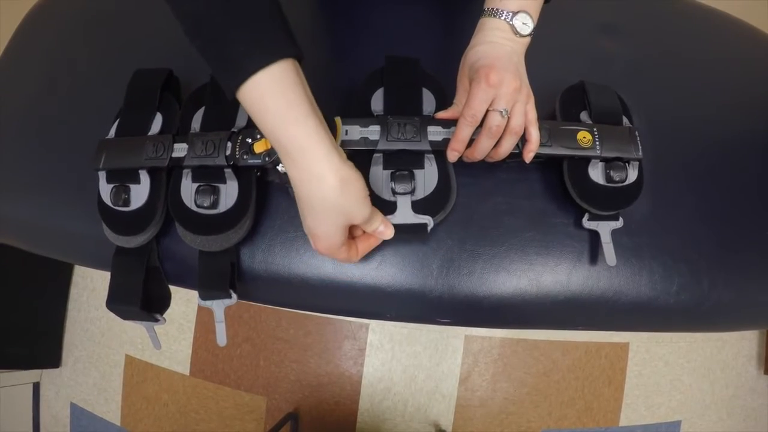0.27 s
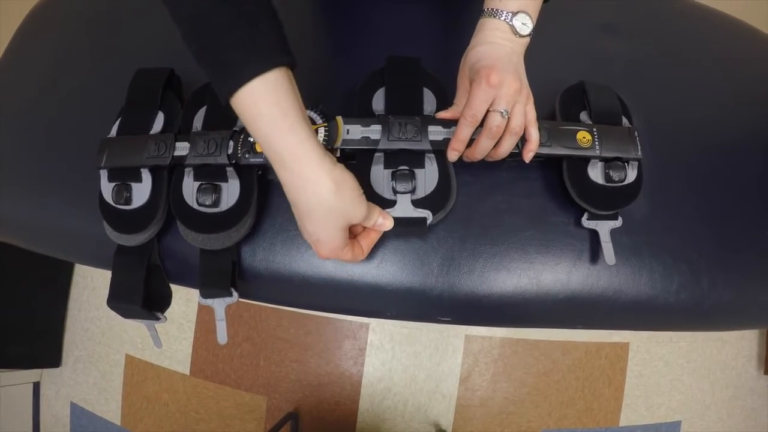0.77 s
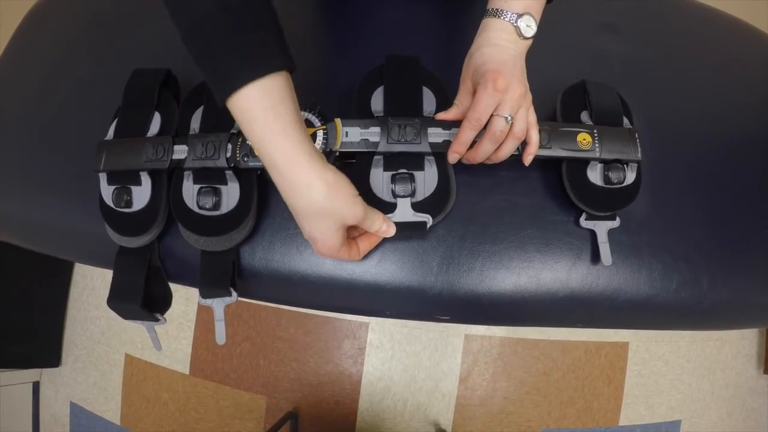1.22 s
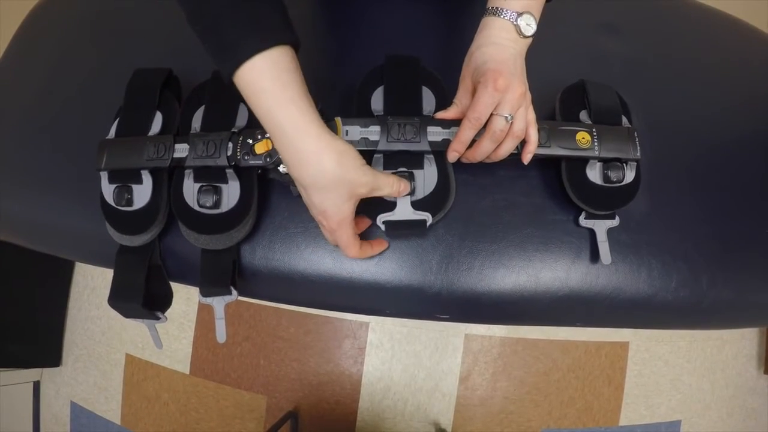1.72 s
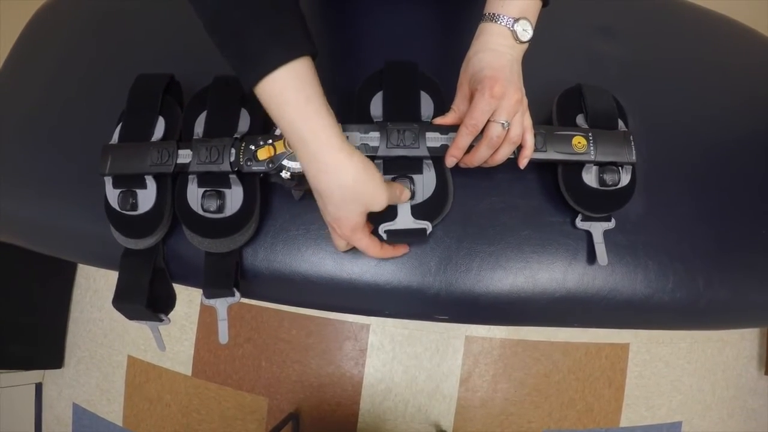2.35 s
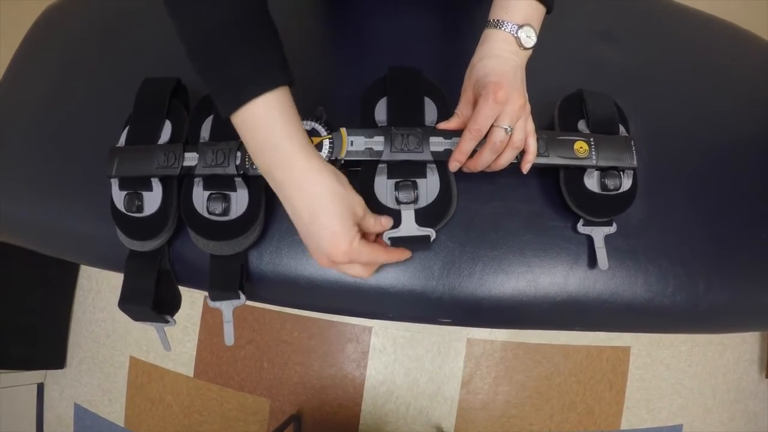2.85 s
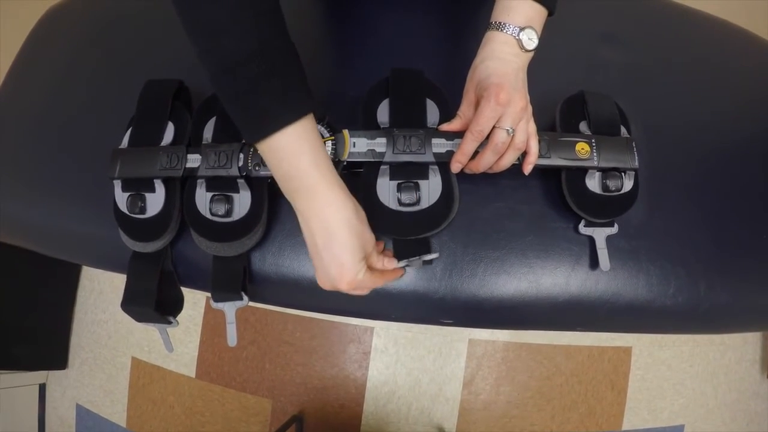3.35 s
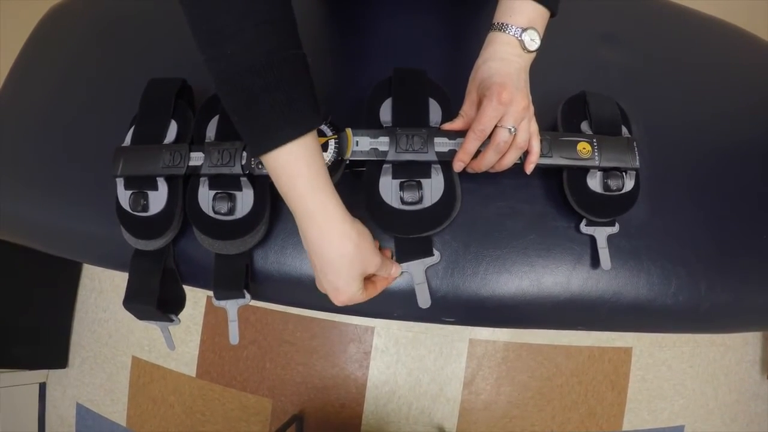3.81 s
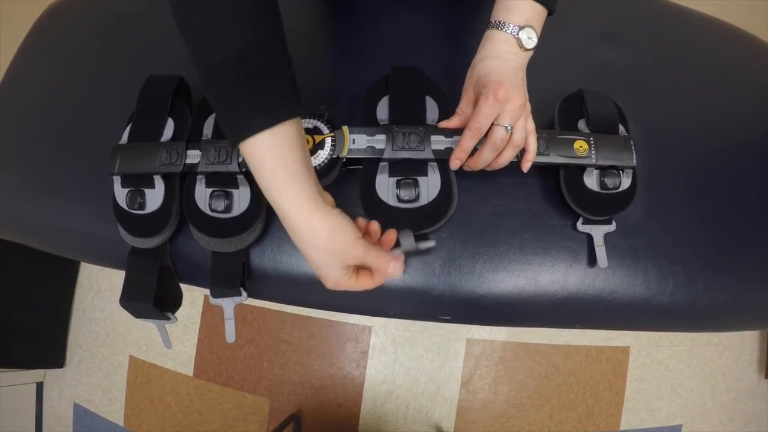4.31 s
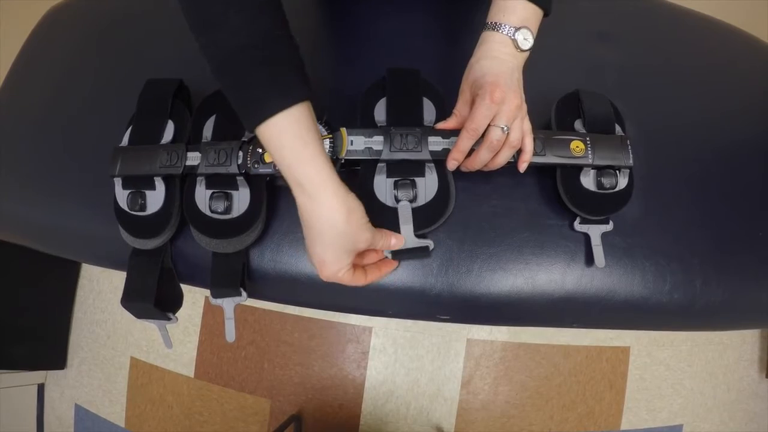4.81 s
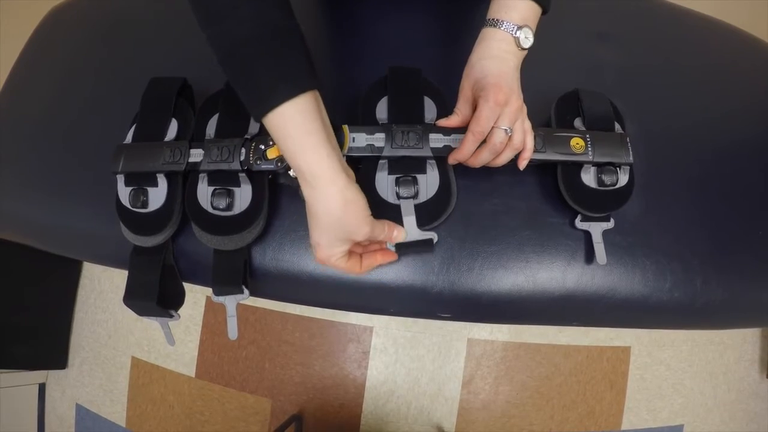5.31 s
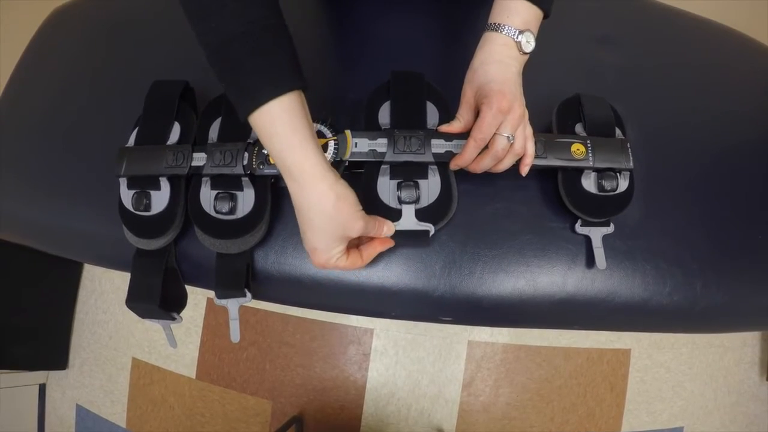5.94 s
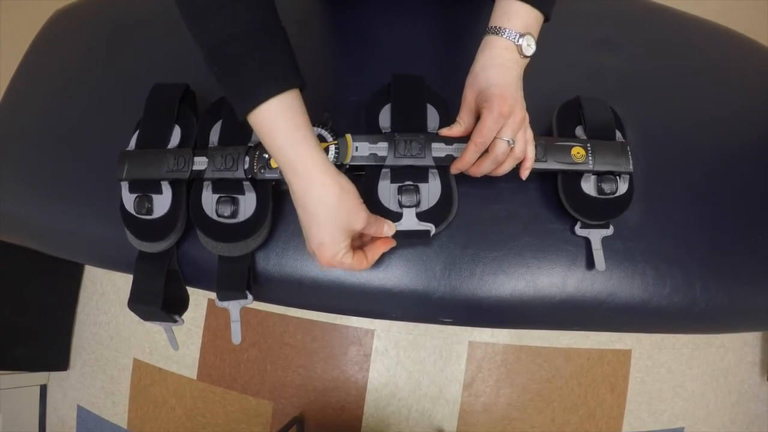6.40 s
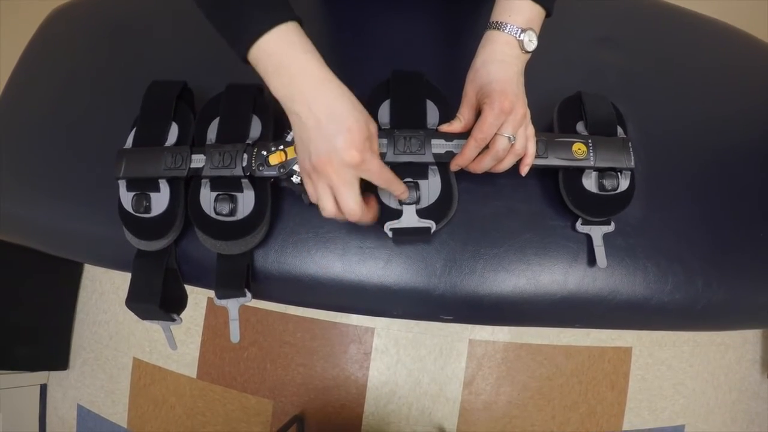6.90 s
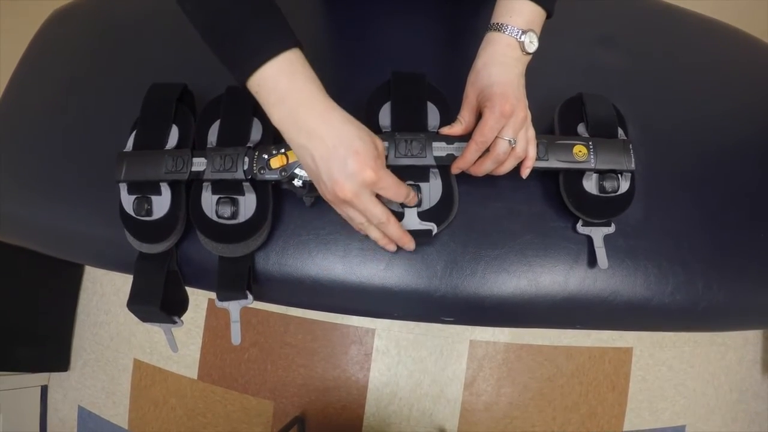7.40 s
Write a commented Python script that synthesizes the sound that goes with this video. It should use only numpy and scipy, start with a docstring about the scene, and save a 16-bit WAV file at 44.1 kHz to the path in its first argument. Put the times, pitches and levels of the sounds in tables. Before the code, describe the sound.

Close up in a small, quiet room, fingers handle a plastic brace buckle. Small ticks and a short scrape lead to a crisp snap, then softer fumbling. A harder, clustered snap comes at about two and a half seconds, a springy release a second later, then scrapes and ticks before a final double snap. Strap rubbing, dull padded knocks and faint ventilation lie beneath.

```python
"""Buckle of a knee brace

A plastic buckle on a knee brace is snapped shut, released and snapped shut again on a padded table in a small room.
Short pushes ring the resonances of the plastic and the frame: snaps, ticks, scrapes and dull knocks.
Shaped noise makes the fingers rubbing the strap, the arm shifting, and the ventilation, which also hums.
The recorder's noise suppressor turns quiet treble down, but lets the hiss up for a moment after very loud clicks.
"""
import sys
import numpy as np
from scipy import signal
from scipy.fft import rfft, irfft, next_fast_len
from scipy.io import wavfile
from scipy.ndimage import uniform_filter1d, map_coordinates

SR = 44100
rng = np.random.default_rng(int(sys.argv[2]) if len(sys.argv) > 2 else 0)


def master_out(mix):
    """Clip the mix to full scale and print it as 16-bit PCM to the path in sys.argv[1]."""
    frames = np.transpose(np.atleast_2d(mix))
    ceiling = np.clip(frames, -1, 1)
    pcm = np.round(ceiling * 32767).astype(np.int16)
    wavfile.write(sys.argv[1], SR, pcm)


N = 337806  # length in samples
TOP_HZ = 16300  # upper limit of the sound

# resonances of the tab that slides in the slot: (pitch_hz, width_hz, level_db)
TAB_MODES = [(950, 1000, -24.5), (2940, 490, -18.5), (5450, 570, -14), (6330, 500, -5), (8200, 510, 6),
             (9800, 310, -3.5), (10620, 700, -6.5), (12150, 540, -8), (13700, 400, -27)]
# spectrum of low moving air, also used for the arm: (pitch_hz, relative level_db per Hz)
LOW_SPECTRUM = [(10, -24), (20, -0.5), (29, 2), (40, -4.5), (62, -5), (90, -16.5), (160, -29.5), (400, -60)]


def amp(db):
    """Turn decibels into gain."""
    return 10 ** (np.asarray(db) / 20)


def unit(x):
    """Scale to an average (rms) level of 1."""
    return x / np.sqrt(np.mean(x ** 2) + 1e-20)


def along(points, hz):
    """Read a value between (pitch_hz, value) points, on a log pitch axis."""
    point_hz, value = np.transpose(points)
    return np.interp(np.log(hz + 1), np.log(point_hz + 1), value)


def wobble(rate):
    """Draw a smooth random curve with this many random points a second."""
    points = rng.standard_normal(int(N * rate / SR) + 4)
    return map_coordinates(points, [np.arange(N) * rate / SR])


def filtered(x, response):
    """Change the strength of each frequency by response(hz)."""
    size = next_fast_len(len(x) + SR // 8)
    hz = np.fft.rfftfreq(size, 1 / SR)
    return irfft(rfft(x, size) * response(hz), size)[:len(x)]


def coloured(x, spectrum):
    """Give x a spectrum, at rms 1."""
    return unit(filtered(x, lambda hz: amp(along(spectrum, hz))))


def add(track, s, x):
    """Mix x into the track from time s."""
    start = max(round(s * SR), 0)
    track[start:start + len(x)] += x[:max(N - start, 0)]


def blow(length, chatter):
    """One sharp push, then the chatter of touching surfaces, dying away over length seconds."""
    t = np.arange(SR // 2) / SR
    grit = rng.standard_normal(len(t)) * np.exp(-t / length)
    force = chatter * grit / np.linalg.norm(grit)
    force[0] += 1
    return force


def ring(force, modes, bright, pitch=1, travel=.0003, scatter_db=0.36, steepness=1.326):
    """A force rings the resonances, a little differently every time; a bright contact favours high ones."""
    hz, width, db = np.transpose(modes)[:, :, None]
    hz = hz * pitch
    tilt_db = bright * np.log2(hz / hz.mean())
    gains = amp(db + tilt_db + scatter_db * rng.standard_normal(hz.shape))
    f = np.fft.rfftfreq(len(force), 1 / SR)
    humps = (f * width) ** 2 / ((hz ** 2 - f ** 2) ** 2 + (f * width) ** 2)
    power = np.sum(gains ** 2 * humps ** steepness, axis=0)
    # minimum phase: the part answers only after the push
    cepstrum = irfft(np.log(power + 1e-9) / 2)
    cepstrum[1:] *= 2
    cepstrum[len(cepstrum) // 2:] = 0
    # bending waves take the travel time (s) to cross the part, low ones longer, which rounds the attack
    lag = 4 * np.pi * travel * np.sqrt(hz.mean() * f)
    return irfft(rfft(force) * np.exp(rfft(cepstrum) - 1j * lag))


def peaked(x, db):
    """Scale so that the envelope peaks at db."""
    return amp(db) * x / np.abs(signal.hilbert(x)).max()


def in_room(x, room_db, wall_delay=.0082, wall_db=-12, near_db=-5):
    """Direct sound, scatter from things nearby, the first wall's echo and then the diffuse tail."""
    # how long the room takes to fade by 60 dB: (pitch_hz, fade_s)
    fade_times = [(200, 0.61), (600, 0.19), (1500, .34), (4000, .27), (8000, .235), (14000, .17)]
    hz, t, z = signal.stft(rng.standard_normal(SR // 2), SR, nperseg=256)
    fading = z * amp(-60 * t / along(fade_times, hz)[:, None])
    tail = signal.istft(fading, SR, nperseg=256)[1]
    first = round(wall_delay * SR)
    tail[:first] *= amp(near_db)
    tail /= np.linalg.norm(tail)
    tail[first] += amp(wall_db)
    return x + amp(room_db) * signal.fftconvolve(x, tail)[:len(x)]


def swell(s, db, length):
    """Gain of one movement: it speeds up to its top at time s and dies away."""
    rise = .46  # share of the length spent speeding up
    edge_db, roundness = 7.5, 1.4  # drop at either end, shape of the top
    t = np.arange(N) / SR - s
    away = np.abs(t) / (length * np.where(t < 0, rise, 1 - rise))
    return amp(db - edge_db * np.minimum(away, 10) ** roundness)


def background(air_db=-64.0, hum_db=-68, hum_hz=120):
    """Ventilation: low wandering draught, even hiss and a slightly unsteady mains hum."""
    # spectrum of the hiss: (pitch_hz, relative level_db per Hz)
    air_spectrum = [(40, -10.5), (130, 1.5), (190, -5.5), (260, -4.5), (340, -11), (700, -13),
                    (1200, -13.5), (2500, -15), (4700, -18), (8200, -19), (10500, -23), (14000, -25.5),
                    (16000, -35)]
    draught_gain = amp(-57.5 + 1.17 * wobble(5))  # middle level and its wander, in dB
    rumble = draught_gain * coloured(rng.standard_normal(N), LOW_SPECTRUM)
    hiss = amp(air_db) * coloured(rng.standard_normal(N), air_spectrum)
    phase = 2 * np.pi * hum_hz * np.arange(N) / SR + 0.26 * wobble(7.8)
    hum = unit(np.sin(phase) * amp(3.0 * wobble(3)))
    return rumble + hiss + amp(hum_db) * hum


def rubbing(grain_db=2.0, flutter_db=2.0):
    """Skin and webbing slide with a fine, grainy hiss: strokes over a faint, restless grip."""
    # spectrum of the rubbed strap: (pitch_hz, relative level_db per Hz)
    strap_spectrum = [(200, -30.5), (600, -13.5), (1500, -14.5), (3400, -12), (4700, -22.5), (6300, -8),
                      (8300, 0), (10500, -13), (14000, -12.5), (16000, -29)]
    # strokes of the fingers along the strap: (fastest_s, level_db, length_s)
    strokes = [(0.24, -54.5, 0.43), (1.118, -55, 0.11), (1.524, -54.5, .12), (2.422, -61.5, 0.56),
               (2.918, -61, 0.14), (3.383, -56, 0.46), (3.82, -60, 0.4), (4.397, -54, 0.13),
               (4.663, -55.5, 0.33), (4.91, -54.5, 0.076), (5.225, -60, 0.36), (5.561, -56, .25),
               (5.854, -59, 0.16), (6.21, -57.5, 0.16), (6.77, -57.5, 0.063), (7.549, -58.5, .09)]
    grains = rng.standard_normal(N) * amp(grain_db * wobble(700) + flutter_db * wobble(35))
    # the fingers shift slightly as they hold the strap: middle level and its wander, in dB
    grip = amp(-70.5 + 1 * wobble(4))
    sliding = np.sqrt(grip ** 2 + sum(swell(*stroke) ** 2 for stroke in strokes))
    return sliding * coloured(grains, strap_spectrum)


def knocks():
    """The frame takes each push on the padding as a dull knock; faint nudges fall at chance times."""
    # resonances of the brace frame: (pitch_hz, width_hz, level_db)
    frame_modes = [(134, 70, -5.5), (251, 62, 0.5), (390, 89, -5), (580, 400, -4.5), (870, 120, -7),
                   (1400, 700, -20.5)]
    # frame knocking on the padding: (start_s, peak_db, brightness in dB per octave)
    pushes = [(.28, -51.5, -0.5), (.622, -50.5, -8), (1.049, -43, 1.5), (1.119, -39, -0.5), (1.132, -45, 0),
              (1.643, -48.5, 3.5), (2.076, -50, 3.5), (2.323, -50, 3), (2.417, -49, 4.5), (2.4907, -39, -2),
              (2.657, -43.5, 5), (3.248, -45.5, -0.5), (3.397, -56, 2.5), (3.474, -42, -5),
              (4.282, -44.5, 1), (4.934, -48, 2), (6.104, -51, -3), (7.276, -53, -2), (7.421, -47, 0.5),
              (7.532, -47, -2.5)]
    nudge_count, nudge_db, nudge_spread_db = 12, -57, 2  # how many, peak level, its scatter
    nudges = [(rng.uniform(0, N / SR), rng.normal(nudge_db, nudge_spread_db), 0)
              for _ in range(nudge_count)]
    out = np.zeros(N)
    for s, db, bright in pushes + nudges:
        knock = ring(blow(length=.004, chatter=0.34), frame_modes, bright)
        add(out, s, in_room(peaked(knock, db), room_db=-2.5))
    return out


def ticks():
    """Light touches of tab and catch ring only the catch."""
    # resonances of the catch: (pitch_hz, width_hz, level_db)
    catch_modes = [(985, 900, -31.5), (2000, 1600, -31), (3685, 850, -14), (6950, 1500, -6.5),
                   (8800, 1100, -1), (10300, 920, -14.5), (13000, 1800, -24.5)]
    # light touches: (start_s, peak_db, pitch factor, brightness in dB per octave)
    touches = [(.132, -36, 0.92, 0), (.1987, -37.5, 0.81, 6), (0.2025, -34, 0.89, -5),
               (.2291, -25.5, .91, 4), (0.7754, -28, 0.97, -6.5), (2.6567, -28, 0.84, 19),
               (2.704, -26, 0.97, -0.5), (3.3979, -31.5, 0.87, -5.5), (3.7823, -24, 1.01, 0.5),
               (4.2832, -38, 1.1, -1), (4.5018, -37, 1.03, 12), (5.4547, -36.5, 0.96, -6.5),
               (5.518, -32.5, .907, -4), (5.6187, -36, 0.94, -7.5), (5.8204, -37.5, 1, -6.5),
               (5.8858, -36, 0.97, -9.5), (6.121, -37.5, 0.89, 7), (7.055, -33.5, 1.07, 4),
               (7.2763, -28.5, 0.93, -3.5), (7.532, -38, 1.03, -2)]
    out = np.zeros(N)
    for s, db, pitch, bright in touches:
        tick = ring(blow(length=0.00043, chatter=0.56), catch_modes, bright, pitch)
        add(out, s, in_room(peaked(tick, db), room_db=-7))
    return out


def scrapes(slip_rate=1100):
    """The tab sticks and slips along the slot: a quick run of uneven slips (per second) rings it."""
    # runs of slips: (start_s, level_db, length_s, pitch factor, brightness in dB per octave)
    runs = [(0.333, -49.5, 0.007, 1, -8.5), (0.345, -51.5, 0.034, 0.77, -4),
            (1.085, -63.5, 0.034, 0.79, -7), (3.258, -58.5, 0.025, 0.75, 0.5), (3.347, -60, 0.23, 0.75, -6),
            (4.369, -67.5, 0.063, 0.79, -8), (4.714, -52, 0.019, 0.95, -5), (4.899, -55, 0.035, 0.97, -2),
            (5.527, -63, 0.12, 0.89, -6.5), (5.876, -56, 0.014, 0.78, -6.5)]
    out = np.zeros(N)
    t = np.arange(SR // 2) / SR
    for s, db, length, pitch, bright in runs:
        strength = rng.standard_normal(len(t))
        happens = rng.random(len(t)) < slip_rate / SR
        slips = strength * happens * (t < length)
        slips[0] = 1
        scrape = ring(slips, TAB_MODES, bright, pitch)
        scrape *= amp(db) * np.sqrt(length * SR) / np.linalg.norm(scrape)
        add(out, s, in_room(scrape, room_db=-2.5))
    return out


def snaps(rows, modes, chatter, travel):
    """Bent plastic springs free and slaps against its stop; the thumb on it takes off the top."""
    out = np.zeros(N)
    for s, db, pitch, bright, length, room_db, muffle_hz in rows:
        snap = ring(blow(length, chatter), modes, bright, pitch, travel)
        thumb = signal.butter(2, min(muffle_hz, TOP_HZ), fs=SR, output="sos")
        snap = signal.sosfilt(thumb, snap)
        # level counted as rms over 10 ms
        snap *= amp(db) * np.sqrt(SR / 100) / np.linalg.norm(snap)
        add(out, s, in_room(snap, room_db))
    return out


def snapping_shut():
    """The catch snaps into place and rings the whole buckle."""
    # resonances of the buckle: (pitch_hz, width_hz, level_db)
    buckle_modes = [(970, 550, -26), (2050, 990, -23.5), (3185, 480, -11), (5240, 750, -4.5),
                    (6400, 750, -1), (7440, 290, -2.5), (8440, 1000, 1), (9600, 440, -9),
                    (11500, 1600, -9.5), (12640, 1800, -15.5), (14300, 1500, -22)]
    # snaps of the catch: (start_s, level_db, pitch factor, brightness in dB per octave,
    # contact_s, room_db, muffle_hz above which the thumb dulls it)
    closings = [(.622, -25, 1, -0.5, .0004, -1, 14000), (2.4878, -38.5, 0.84, -7, 0.0018, -11.5, 12000),
                (2.4914, -23.5, 1.1, 1, 0.0027, -8, 9100), (2.4942, -24.5, 1.08, 1.5, .0007, -4, 9100),
                (6.234, -24.5, 1, -0.5, 0.0004, 0.8, 13000), (6.295, -31, 0.97, -1.5, 0.00053, -6.5, 14000)]
    return snaps(closings, buckle_modes, chatter=0.55, travel=.0007)


def springing_open():
    """The tab springs out of its slot and rings by itself."""
    # release of the tab: (start_s, level_db, pitch factor, brightness in dB per octave,
    # contact_s, room_db, muffle_hz above which the thumb dulls it)
    releases = [(3.4736, -27.5, 0.99, -1, 0.0023, -6.5, 14000)]
    return snaps(releases, TAB_MODES, chatter=0.39, travel=.0015)


def arm():
    """The arm shifting its weight over the table adds soft, low swells of noise."""
    # shifts of the arm: (top_s, level_db, length_s)
    moves = [(4.153, -55, 0.21), (4.62, -52.5, 0.15), (5.32, -50, .16), (6.79, -43, .11)]
    return sum(swell(*move) for move in moves) * coloured(rng.standard_normal(N), LOW_SPECTRUM)


def suppress(x, depth_db=9, quiet_db=-55, span_db=13, loud_db=-29.0, hold=0.405, corner_hz=520):
    """Quiet treble is turned down; a click passes at once, a very loud one holds it open (hold in s)."""
    treble = filtered(x, lambda hz: hz * hz / (hz * hz + corner_hz * corner_hz))

    def level(size):
        """Treble level in dB, averaged over size samples."""
        return 10 * np.log10(np.abs(uniform_filter1d(treble ** 2, size)) + 1e-14)

    passing = np.clip((level(size=SR // 300) - quiet_db) / span_db, 0, 1)
    loud = level(size=SR // 30) > loud_db
    trigger = np.diff(loud.astype(int), prepend=0) > 0
    # the centred average sees a click half its length early, so wait that long
    trigger = np.roll(trigger, SR // 60)
    held = signal.fftconvolve(trigger, np.ones(round(hold * SR)))[:N] > .5
    opening = np.maximum(passing, uniform_filter1d(held.astype(float), size=SR // 70))
    return x - treble * (1 - amp(-depth_db * (1 - opening)))


def scene():
    """Buckle, hands and room at one microphone."""
    room_and_hands = background() + rubbing() + knocks() + arm()
    buckle = ticks() + scrapes() + snapping_shut() + springing_open()
    return (room_and_hands + buckle)[None]


def record(dry):
    """Noise suppressor, then a steep cut above the upper limit."""
    return filtered(suppress(dry[0]), lambda hz: 1 / (1 + (hz / TOP_HZ) ** 120))[None]


dry = scene()
out = record(dry)
master_out(out)
```